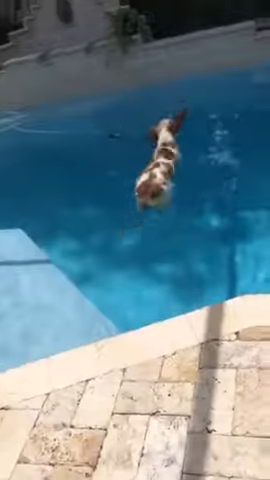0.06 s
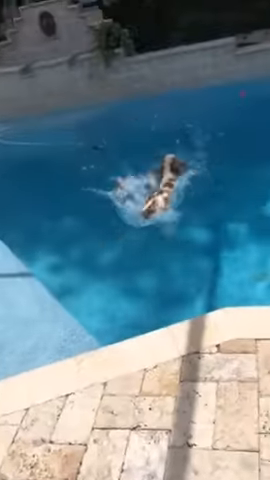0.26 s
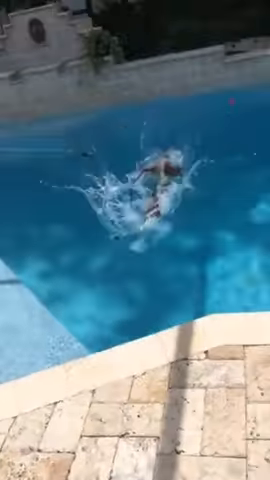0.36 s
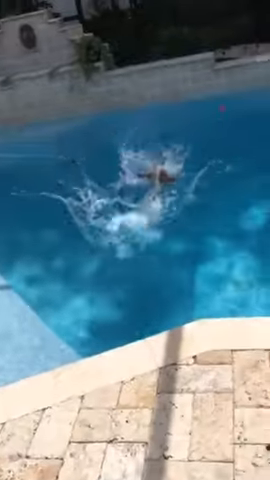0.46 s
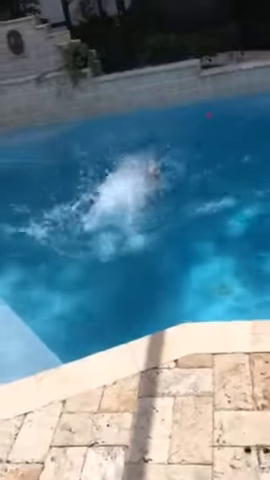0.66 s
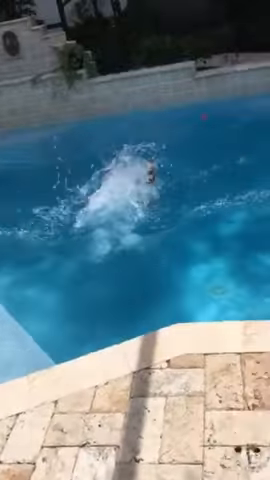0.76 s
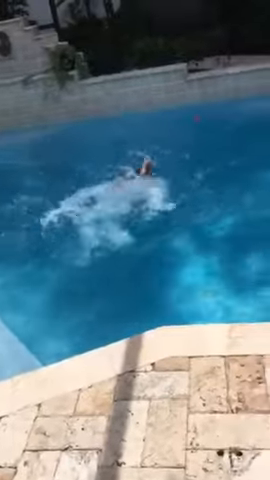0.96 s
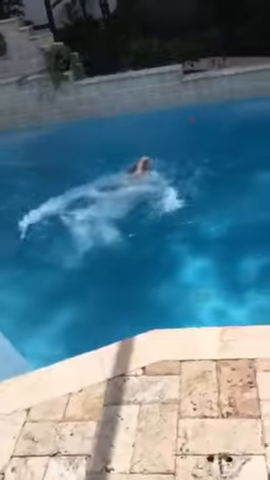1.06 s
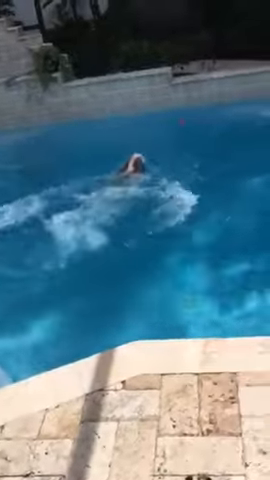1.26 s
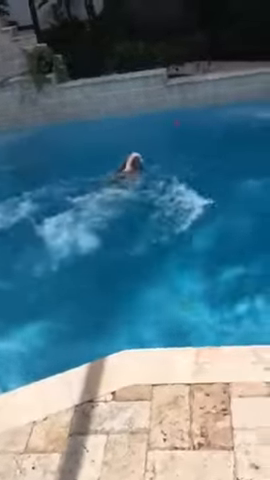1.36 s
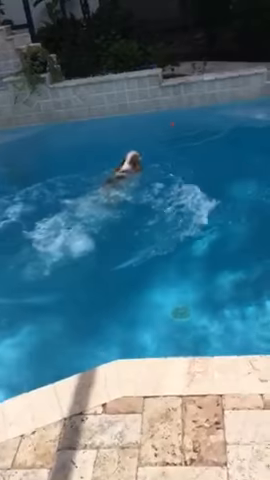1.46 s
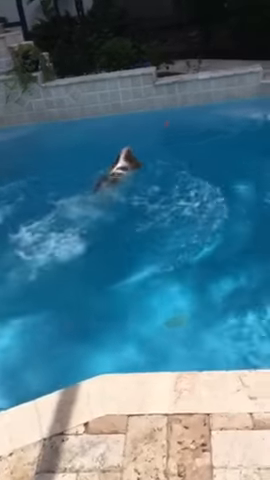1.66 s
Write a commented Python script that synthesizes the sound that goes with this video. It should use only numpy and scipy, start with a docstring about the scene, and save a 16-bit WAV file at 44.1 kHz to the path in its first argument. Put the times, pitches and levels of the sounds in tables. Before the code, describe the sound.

A dog's splash into an outdoor pool. Low rumble runs throughout; a faint rising bird whistle and tiny drops open it. At 0.24-0.30 s paws and belly slap sharply, loudest at 0.29. Bubbles gulp, and a deep thump swells at 0.49. Spray bursts around 0.6, then rains, fizzes and gurgles with paddling, surging near 1.1 and fading by 1.5. Bird chirps at 0.85 and 1.25; short wall reflections.

```python
"""A dog lands in an outdoor pool, over a low rumble of filtered noise that runs throughout.
First a thin whistle of tone and breath from a bird, and water drops made of short dying tones.
Then noise bursts slap as paws and belly hit, and dying low tones thump as air cavities close behind the body.
Thrown water rains back as noise, fizz and bubbles while the dog paddles off; the bird whistles twice more.
"""
import sys
import numpy as np
from scipy import signal
from scipy.fft import rfft, irfft, next_fast_len
from scipy.io import wavfile
from scipy.ndimage import uniform_filter1d, map_coordinates

SR = 44100
rng = np.random.default_rng(int(sys.argv[2]) if len(sys.argv) > 2 else 0)


def dump_mix(stems):
    """Bounce the given channels to the path in sys.argv[1] as a 16-bit WAV at rate SR."""
    frames = np.atleast_2d(stems).T  # one column per channel
    limited = np.clip(frames, -1, 1)  # hard clip at full scale
    pcm = np.round(limited * 32767).astype(np.int16)
    wavfile.write(sys.argv[1], SR, pcm)


N = 74970
T = np.arange(N) / SR  # time of each sample [s]


def amp(db):
    """Turn decibels into a gain."""
    return 10 ** (np.asarray(db) / 20)


def unit(x):
    """Scale a sound to an average strength (rms) of 1."""
    return x / np.sqrt(np.mean(x ** 2) + 1e-20)


def curves(rows):
    """Join the points of each column after the time with straight lines, one value per sample."""
    times, *columns = np.transpose(rows)
    return [np.interp(T, times, column) for column in columns]


def wobble(knots_per_s):
    """Draw a smooth random curve through this many random points a second."""
    knots = rng.standard_normal(int(N * knots_per_s / SR) + 4)
    return map_coordinates(knots, [T * knots_per_s])


def coloured(x, points):
    """Make some pitches of a sound stronger or weaker, following (frequency, level) points."""
    size = next_fast_len(N + 8192)
    hz, db = np.transpose(points)
    bins_hz = np.fft.rfftfreq(size, 1 / SR)
    gain_db = np.interp(np.log(bins_hz + 1), np.log(hz + 1), db)
    return irfft(rfft(x, size) * amp(gain_db), size)[:N]


def rush(spectrum, patchy_db):
    """Noise whose strength varies in random patches of time and pitch, coloured, at rms 1."""
    patches = signal.stft(rng.standard_normal(N + 512), nperseg=256)[2]
    field = uniform_filter1d(rng.standard_normal(patches.shape), size=8, axis=0)  # smooth over pitch
    field = uniform_filter1d(field, size=6, axis=1)  # smooth over time
    noise = signal.istft(patches * amp(patchy_db * unit(field)), nperseg=256)[1][:N]
    return unit(coloured(noise, spectrum))


def pings(s, db, hz, t60, rise, attack, size):
    """Dying tones that fall 60 dB in t60 while pitch climbs by the share rise; attack is a share of t60."""
    s, db, hz, t60, attack = (np.asarray(v, float).reshape(-1, 1) for v in (s, db, hz, t60, attack))
    t = np.arange(size) / SR
    phase = 2 * np.pi * hz * (t + rise * t * t / (2 * t60))
    fade = amp(db - 60 * t / t60) * (1 - np.exp(-t / (attack * t60)))
    playable = hz * (1 + rise * t / t60) < SR / 2  # silent once the pitch is too high for the sample rate
    wave = fade * np.sin(phase) * playable
    at = np.round(s * SR).astype(int) + np.arange(size)
    return np.bincount(at.ravel(), wave.ravel(), N + size)[:N]


def grains(per_s, hz, spread, cycles, spiky_db, rise, size, rarest):
    """A random cloud of small bubbles, rms 1: mostly faint, a few loud, with rarest capping the loudest."""
    draws = rng.random((4000, 3))[:int(per_s * N / SR)]
    pitch = hz * np.exp(spread * rng.standard_normal(4000)[:len(draws)])
    pitch = np.clip(pitch, 100, 16000)
    start = draws[:, 0] * (N - 1) / SR
    level_db = -spiky_db * np.log(draws[:, 1] + rarest)
    return unit(pings(start, level_db, pitch, cycles / pitch, rise, 0.055, size))


# Tone of the rumble: (frequency [Hz], level [dB])
RUMBLE_COLOUR = [(20, -58), (35, -30), (59, 2.5), (92, -10.5), (124, -8), (145, -11.5), (300, -40),
                 (400, -100)]
# Loudness of the rumble: (time [s], level [dB])
RUMBLE_LOUDNESS = [(0.0, -52), (0.3, -47), (1.05, -48), (1.11, -56), (1.24, -45), (1.36, -45), (1.47, -51),
                   (1.7, -47)]


def low_rumble():
    """Noise kept to the deep bass, slowly rising and falling."""
    level_db = curves(RUMBLE_LOUDNESS)[0]
    return amp(level_db) * rush(RUMBLE_COLOUR, patchy_db=-1.5)


YARD_T60_S, YARD_DB = .2, -11  # time for the answer to fall 60 dB, and its level


def yard(x):
    """Walls round the pool answer with a dense, dying tail that starts 6 ms after the sound."""
    t = np.arange(SR // 2) / SR
    tail = rng.standard_normal(len(t)) * amp(-60 * t / YARD_T60_S) * (t > .006)
    return signal.fftconvolve(x, tail / np.linalg.norm(tail))[:N]


BREATH_KNOTS_PER_S, CLEAR_TONE = 550, .5  # speed of the breathy wobble, and share of steady tone
FLICKER_PER_S, FLICKER_DB = 150, 2.2  # speed and depth of the flicker in loudness
# Pitch and loudness of the bird, one list per call: (time [s], pitch [Hz], level [dB])
BIRD_CALLS = [
    [(.0, 4250, -62), (.045, 4500, -59), (.065, 5200, -54), (.09, 5100, -58), (.15, 5800, -57),
     (.2, 6070, -55), (.25, 6000, -56)],
    [(.82, 6300, -60), (.85, 5750, -48), (.89, 5600, -54)],
    [(1.22, 7350, -54), (1.245, 7300, -50), (1.258, 6600, -52), (1.275, 5950, -48), (1.297, 6100, -51),
     (1.335, 5800, -56)],
]


def bird():
    """Thin, breathy whistles: a gliding tone with a band of noise round it, flickering fast."""
    out = np.zeros(N)
    for call in BIRD_CALLS:
        hz, db = curves(call)
        on = (T > call[0][0]) & (T < call[-1][0])
        # random changes of size and phase spread the tone into a band of noise
        breath = CLEAR_TONE + (wobble(BREATH_KNOTS_PER_S) + 1j * wobble(BREATH_KNOTS_PER_S)) / 2
        tone = np.exp(2j * np.pi * np.cumsum(hz) / SR)
        level = amp(db + FLICKER_DB * wobble(FLICKER_PER_S))
        out += on * level * np.real(breath * tone) * np.sqrt(2)
    return out


DROP_CYCLES, DROP_ROUGH = 70, 1.6  # cycles in which a tick falls 60 dB, and depth of its roughness
# Single drops that tick: (time [s], level [dB], pitch [Hz])
TICKING_DROPS = [(0.097, -35, 11500), (.19, -34, 12500), (.208, -28, 11800), (.84, -26.5, 8900),
                 (0.916, -29, 9400), (1.177, -26.5, 9450), (1.225, -25, 10400), (1.488, -29.5, 9600),
                 (1.5, -27.5, 9050)]


def ticking_drops():
    """Each drop is a short, high, dying tone, roughened by a fast random curve."""
    s, db, hz = np.transpose(TICKING_DROPS)
    ticks = pings(s, db, hz, DROP_CYCLES / hz, 0, 0.081, size=900)
    return ticks * unit(1 + DROP_ROUGH * wobble(7000))


GULP_RISE = 0.77  # share by which pitch climbs over t60
# Large bubbles, and two high, tonal water drops (2560 and 3200 Hz):
# (time [s], level [dB], start pitch [Hz], t60 [s])
BUBBLES_AND_TONAL_DROPS = [(.245, -23, 950, 0.0084), (0.308, -32, 990, 0.036), (.32, -25.5, 706, 0.042),
                           (.432, -24, 257, 0.066), (.445, -23.5, 477, 0.048), (.488, -19, 410, 0.047),
                           (0.489, -22.5, 156, 0.031), (.657, -27.5, 930, 0.034),
                           (.052, -42.5, 2560, 0.021), (0.715, -28, 3200, 0.013), (.728, -27, 562, 0.043),
                           (.906, -28, 370, .08), (1.018, -30.5, 536, 0.096), (1.058, -26, 880, 0.045),
                           (1.057, -29, 1290, 0.061), (1.105, -32.5, 894, 0.076), (1.262, -36, 278.5, 0.15)]


def bubbles_and_tonal_drops():
    """Large bubbles and two high, tonal water drops: each rings as a dying tone that climbs in pitch."""
    return pings(*np.transpose(BUBBLES_AND_TONAL_DROPS), GULP_RISE, 0.061, size=5000)


BUBBLE_RISE = 0.37  # share by which the pitch of a small bubble climbs over t60
FIZZ_PER_S, FIZZ_HZ, FIZZ_DB = 1500, 8900, -8  # grains a second, middle pitch, level against the spray noise
GURGLE_PER_S, GURGLE_HZ, BUBBLY_DB = 900, 900, -5  # the same for bubbles against the gurgle noise
# Tone of the spray, the gurgle and the low churn, each: (frequency [Hz], level [dB])
SPRAY_COLOUR = [(200, -49), (600, -5.5), (1500, 3.5), (4000, 0), (16000, -4.5)]
GURGLE_COLOUR = [(100, -2.5), (250, -11), (600, 1), (1200, -1.5), (2500, -10), (4000, -18)]
CHURN_COLOUR = [(70, -26), (130, 6), (280, 2.5), (450, -20.5)]
# Loudness of the thrown water:
# (time [s], spray level [dB], gurgle level over the spray [dB], churn level over the spray [dB])
WATER_LOUDNESS = [(0, -56.5, -3, -6.5), (.17, -55.5, -6.5, -9), (.2, -48.5, -10.5, -14),
                  (.236, -51.5, -1.5, -12), (.262, -44.5, -12.5, -17), (.278, -40, -19, -6),
                  (.292, -34.5, -4.5, -6), (.345, -35, 3, -1), (.39, -40.5, 5, 0), (.44, -44, 7, 9.5),
                  (.468, -43.5, 4.5, 5), (.495, -39, 3, 2.5), (.53, -41, 4, 1.5), (.575, -34.5, 1, -12),
                  (.618, -31.5, -6, -17), (.64, -40, 2, -6), (.74, -38.5, -4.5, -9),
                  (.82, -42.5, -4.5, -17.5), (.89, -40, -4, -29), (.92, -40.5, 0.5, -20),
                  (1.05, -36.5, -2, -22.5), (1.1, -36, -9, -22), (1.23, -39.5, -5, -17),
                  (1.3, -43, -5, -25), (1.44, -45.5, -4.5, -12), (1.53, -50, -2, -15),
                  (1.7, -54.5, 2.5, -27)]


def thrown_water():
    """Spray of hiss and fizz, a gurgle of noise and small bubbles, and a low churn."""
    spray_db, gurgle_over_db, churn_over_db = curves(WATER_LOUDNESS)
    shared_db = 0.5 * wobble(25) + .8 * wobble(90)
    fizz = grains(FIZZ_PER_S, FIZZ_HZ, spread=.6, cycles=4, spiky_db=4, rise=.1, size=160, rarest=.03)
    spray = rush(SPRAY_COLOUR, patchy_db=1.5) + amp(FIZZ_DB) * fizz
    bubbles = grains(GURGLE_PER_S, GURGLE_HZ, spread=.55, cycles=14, spiky_db=3,
                     rise=BUBBLE_RISE, size=2000, rarest=.02)
    gurgle = rush(GURGLE_COLOUR, patchy_db=1.2) + amp(BUBBLY_DB) * bubbles
    churn = rush(CHURN_COLOUR, patchy_db=3.0)
    water = unit(spray) + amp(gurgle_over_db) * unit(gurgle) + amp(churn_over_db) * churn
    return amp(spray_db + shared_db) * water


# Air cavities closing behind the body: (time [s], level [dB], pitch [Hz], attack [s], t60 [s])
AIR_CAVITIES = [(0.295, -20, 78, 0.0081, 0.071), (0.333, -18, 57, 0.0074, 0.22),
                (0.485, -12, 83, 0.023, 0.23)]


def cavities():
    """Each closing pocket of air thumps as a deep tone that swells in and dies away."""
    s, db, hz, attack, t60 = np.transpose(AIR_CAVITIES)
    return pings(s, db, hz, t60, 0, attack / t60, size=20000)


SLAP_CRACK_S = 0.0021  # time for the crack to fall 60 dB
# Slaps on the surface:
# (time [s], level [dB], t60 of the wash [s], t60 of the run-up [s], wash level over the crack [dB])
SURFACE_SLAPS = [(0.2432, -23, 0.064, 0.00043, -5), (0.2575, -28.5, 0.022, 0.0044, 2.5),
                 (.2880, -6.5, 0.04, 0.0051, -12.5), (0.3014, -19, .02, 0.001, -15)]


def slaps():
    """Each slap is noise: a quick run-up, a very short crack and a dying wash."""
    out = np.zeros(N)
    for s, db, wash_t60, run_up_t60, wash_db in SURFACE_SLAPS:
        t = np.maximum(T - s, 0)
        crack = amp(-60 * t / SLAP_CRACK_S) * (T >= s)
        wash = amp(wash_db - 60 * t / wash_t60)
        run_up = amp(-60 * np.clip(s - T, 0, 1) / run_up_t60)
        noise = np.tanh(1.5 * rng.standard_normal(N))  # softly limits the tallest peaks
        out += amp(db - 5) * run_up * (crack + wash) * noise
    return coloured(out, [(300, -5), (1500, 3.5), (7000, 4), (11000, 4), (15000, -1.0)])


def scene():
    """Mix everything; the walls answer all but the rumble and the thrown water."""
    echoed = bird() + ticking_drops() + bubbles_and_tonal_drops() + cavities() + slaps()
    return (low_rumble() + amp(YARD_DB) * yard(echoed) + thrown_water() + echoed)[None]


TOP_HZ = 15800  # upper limit of the sound
# Colour of the microphone: (frequency [Hz], level [dB])
MIC_COLOUR = [(22, -27), (40, -1.5), (3100, 0.5), (4900, -3.5), (5700, 1.5), (6800, 3), (7700, -1.5),
              (9200, 3.5), (10400, 0), (12000, 2.5)]


def record(dry):
    """Add the microphone colour, then cut the highest treble steeply."""
    heard = coloured(dry[0], MIC_COLOUR)
    return coloured(heard, [(TOP_HZ - 40, 0), (TOP_HZ + 40, -90)])[None]


dry = scene()
out = record(dry)
dump_mix(out)
```